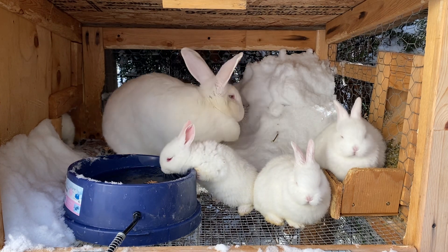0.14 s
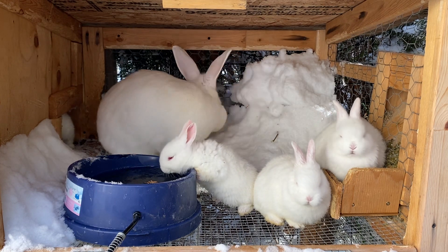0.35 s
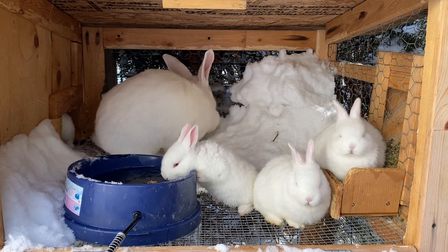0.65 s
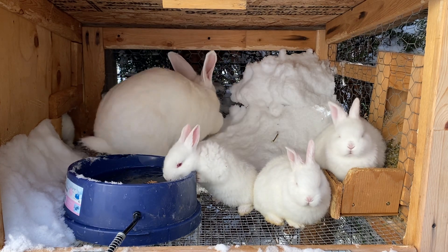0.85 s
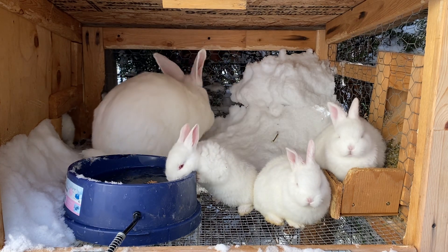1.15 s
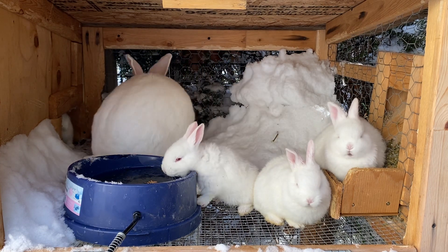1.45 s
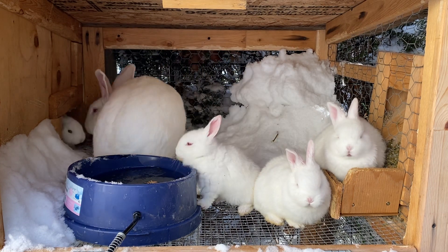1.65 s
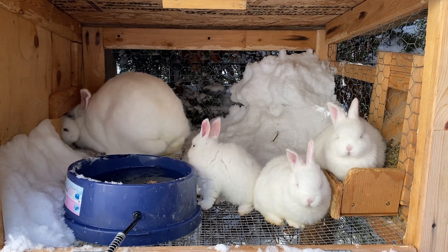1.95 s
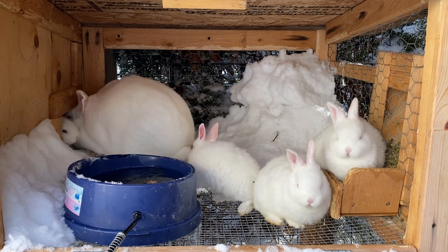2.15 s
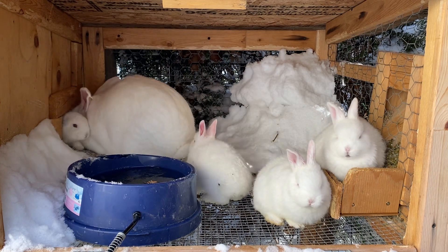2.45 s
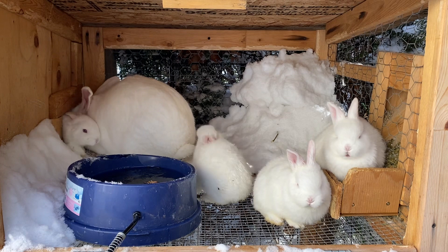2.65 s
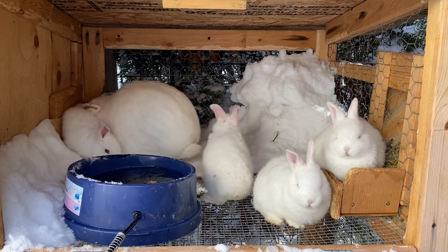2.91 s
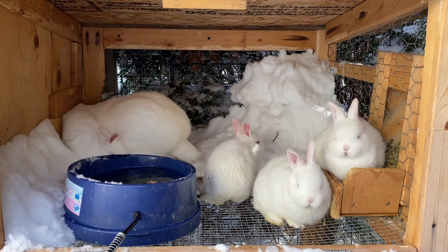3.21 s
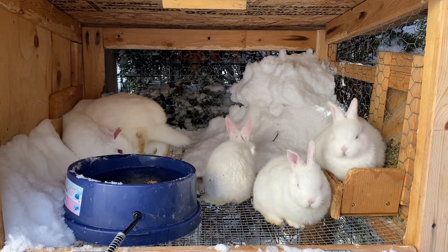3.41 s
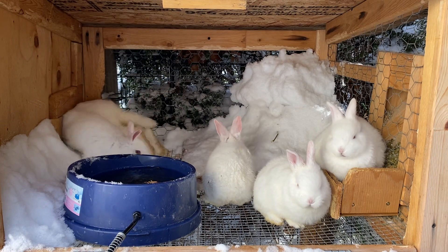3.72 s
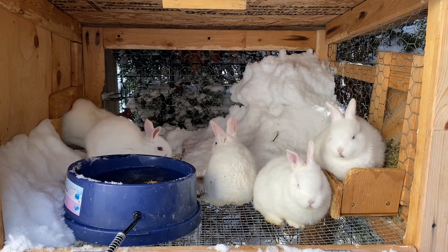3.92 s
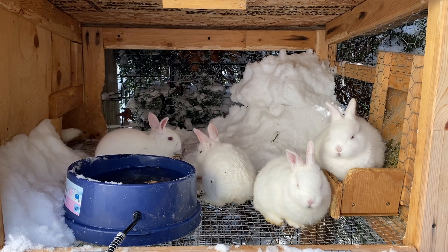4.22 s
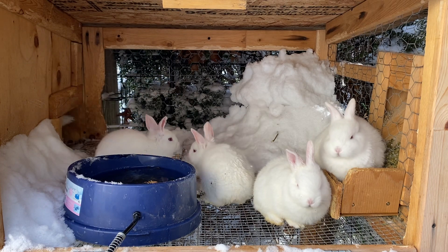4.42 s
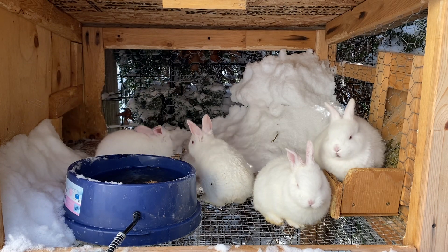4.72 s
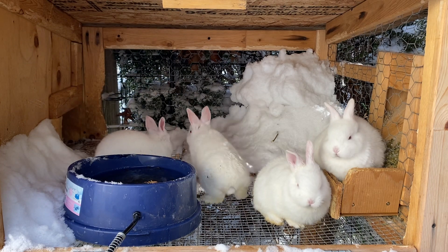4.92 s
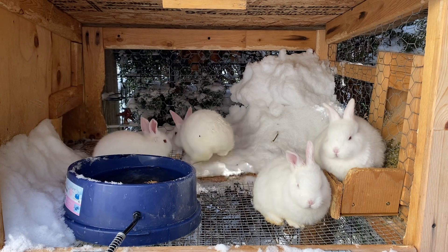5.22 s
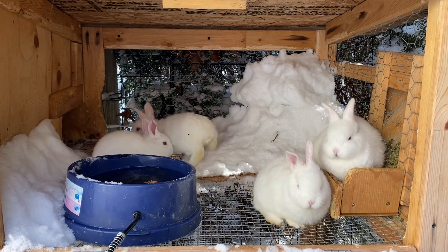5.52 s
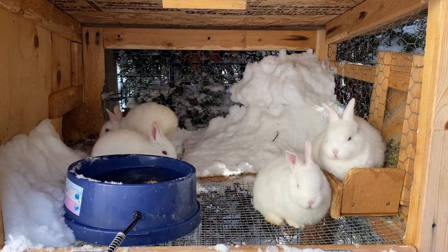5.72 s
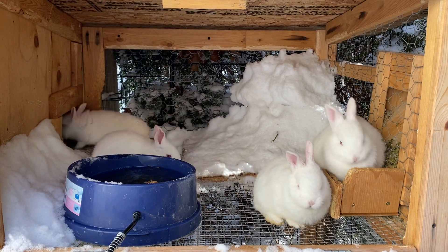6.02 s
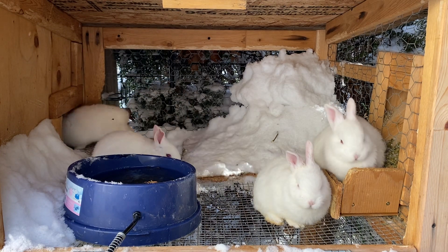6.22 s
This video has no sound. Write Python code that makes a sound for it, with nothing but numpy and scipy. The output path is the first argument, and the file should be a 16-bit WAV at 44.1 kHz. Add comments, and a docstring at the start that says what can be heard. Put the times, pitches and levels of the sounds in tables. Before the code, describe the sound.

Small claws scrabble and patter lightly over wire and planks, fur scuffs softly, paws thud low, and a hind foot knocks the wall once.

```python
"""Young rabbits in a hutch

Outdoors on a still day, young rabbits shuffle and hop in a wooden hutch with a wire floor. Claws tap wood and
scratch wire as decaying resonances; fur and paws scuff and rub as shaped noise; landing paws and shifting
weight ring the floor; one hind foot knocks a wall panel. A distant rumble and still air lie under all, as
coloured noise. A pocket recorder with two ports stands close by, at the open front."""
import sys
import numpy as np
from scipy import signal
from scipy.fft import rfft, irfft, next_fast_len
from scipy.io import wavfile
from scipy.ndimage import uniform_filter1d

SR = 44100
rng = np.random.default_rng(int(sys.argv[2]) if len(sys.argv) > 2 else 0)


def inscribe(sig):
    """Save sig as 16-bit PCM at rate SR to the path in sys.argv[1].

    A 1-D sig is mono; a 2-D sig holds one channel per row.
    Samples are clipped to [-1, 1] before scaling.
    """
    pcm = np.round(np.clip(np.atleast_2d(sig).T, -1, 1) * 32767)
    wavfile.write(sys.argv[1], SR, pcm.astype(np.int16))


N = 280322

# floor board resonances: (frequency [Hz], width [Hz], relative level [dB])
BOARD_MODES = [(136.4, 39.7, 2.5), (205.6, 76, -2), (300, 170, -8.5)]
# how restless the litter is, as level of the soft scuffing: (time [s], level [dB])
RESTLESSNESS = [(0.0, -83), (0.76, -79), (1.06, -83.5), (1.88, -80.5), (2.39, -82), (3.2, -72), (3.86, -72),
                (4.2, -78), (5.19, -78.5), (5.52, -79), (6.36, -78.5)]


def from_db(db):
    """Decibels to gain."""
    return 10 ** (np.asarray(db) / 20)


def rms_one(x):
    """Scale to rms 1."""
    return x / np.sqrt(np.mean(x ** 2) + 1e-20)


def peak_at(x, db):
    """Scale to a peak level."""
    return x / np.abs(x).max() * from_db(db)


def in_time(rows):
    """Read the columns of a time table at every sample."""
    s, *columns = np.transpose(rows)
    return [np.interp(np.arange(N) / SR, s, c) for c in columns]


def at_hz(points, hz):
    """Read a spectrum table on a log-frequency axis."""
    table_hz, values = np.array(points).T
    return np.interp(np.log(hz + 1), np.log(table_hz), values)


def colour(x, points):
    """Shape the spectrum by a table of levels."""
    size = next_fast_len(N)
    gain = from_db(at_hz(points, np.fft.rfftfreq(size, 1 / SR)))
    return irfft(rfft(x, size) * gain, size)[..., :N]


def band(x, low_hz, high_hz):
    """Band-pass."""
    return signal.sosfilt(signal.butter(2, [low_hz, high_hz], "band", fs=SR, output="sos"), x)


def resonate(x, hz, width_hz):
    """One damped resonance with a gain of about 1 at its top."""
    r = np.exp(-np.pi * width_hz / SR)
    feedback = [1, -2 * r * np.cos(2 * np.pi * hz / SR), r * r]
    return signal.lfilter([(1 - r * r) / 2, 0, (r * r - 1) / 2], feedback, x)


def pan(x, place):
    """Place a source from -1 (right) to 1 (left): that share of it is the left-right difference."""
    return x * np.array([[1 + place], [1 - place]])


def drift(rate):
    """Slow random wander with rms 1, made of noise low-passed around a rate in Hz."""
    r = np.exp(-2 * np.pi * rate / SR)
    wander = signal.lfilter([1], [1, -2 * r, r * r], rng.standard_normal(N + SR))
    return rms_one(wander[SR:])   # the first second lets the filter settle


def add(out, s, sound):
    """Mix a short sound in at a time."""
    i = round(s * SR)
    out[..., i:i + sound.shape[-1]] += sound[..., :N - i]


def scratches(rise_s=0.0013):
    """A jitter of tiny claw slips swells within milliseconds and dies; the wire favours one band and ticks on top."""
    # claws skidding on wire:
    # (time [s], skid peak [dB], loudest frequency [Hz], tick level [dB], decay by 60 dB [s])
    skid_rows = [(0.0652, -55.5, 3860, -72, 0.068), (0.578, -53, 3300, -78, 0.07),
                 (0.5957, -64, 4470, -61.5, 0.016), (0.609, -42, 1610, -69, 0.012),
                 (0.6305, -57, 2480, -73, 0.026), (0.7129, -42, 2500, -61.5, 0.03),
                 (0.8133, -33, 4040, -53.5, 0.03), (0.9734, -87.5, 1640, -78, 0.024),
                 (1.3135, -47.5, 2700, -65.5, 0.019), (1.3352, -65, 2650, -70, 0.12),
                 (1.3757, -50, 1760, -71, 0.045), (1.43, -52.5, 1700, -71, 0.046),
                 (1.4975, -54.5, 2170, -74, 0.028), (1.658, -44, 3300, -68, 0.042),
                 (1.7192, -54, 1560, -57.5, 0.015), (1.7569, -45, 2180, -100, 0.032),
                 (1.931, -57.5, 4070, -80, 0.054), (2.018, -40, 2620, -61, 0.041),
                 (2.152, -69, 1610, -88, 0.04), (2.9921, -51.5, 4800, -72, 0.13),
                 (3.032, -43.5, 2160, -59.5, 0.05), (3.1362, -48.5, 4030, -73, 0.04),
                 (3.249, -55.5, 2340, -79, 0.076), (3.3767, -60, 4660, -68.5, 0.037),
                 (3.4023, -50.5, 2340, -73, 0.074), (3.6503, -50.5, 3480, -72, 0.081),
                 (3.753, -47, 1560, -69, 0.072), (3.9002, -49, 2100, -72, 0.073),
                 (3.946, -44, 2030, -75, 0.035), (3.971, -37, 2110, -58.5, 0.034),
                 (4.2602, -56.5, 1870, -73, 0.056), (4.34, -55, 1500, -91, 0.023),
                 (4.4444, -46, 4660, -79, 0.028), (4.5927, -30, 3330, -58.5, 0.034),
                 (4.649, -38, 2820, -67, 0.031), (4.6646, -28, 4600, -50.5, 0.032),
                 (4.695, -46.5, 3490, -60, 0.015), (4.8868, -55, 1920, -73, 0.047),
                 (5.011, -49, 4300, -65, 0.045), (5.0685, -55, 1770, -75, 0.05),
                 (5.5483, -61, 1800, -72.5, 0.037), (5.91, -59, 6740, -62, 0.028)]
    out, t = np.zeros(N), np.arange(3500) / SR
    noises = rng.standard_normal((len(skid_rows), len(t)))
    for (s, db, hz, tick_db, t60), noise in zip(skid_rows, noises):
        swell = 1 - np.exp(-(t / rise_s) ** 2)
        jitter = noise * from_db(-60 * t / max(t60, .004)) * swell
        skid = resonate(jitter, hz, 0.15 * hz) + 0.86 * band(jitter, 540, 6430)
        tick = band(jitter, 5200, 22000)
        tick_rms = np.std(tick[:SR // 50])   # over the first 20 ms
        add(out, s, peak_at(skid, db) + from_db(tick_db) * tick / tick_rms)
    return out


def taps(place=-0.17):
    """One short rounded claw contact sets off a heavily damped ring; the wood keeps the treble down."""
    # single claw taps on wood: (time [s], peak [dB], pitch that scales both resonances [Hz])
    tap_rows = [(0.102, -46, 1010), (0.338, -41.5, 1100), (0.363, -56, 1240), (0.611, -39.5, 1600),
                (0.735, -40.5, 1320), (0.777, -44, 1070), (2.094, -59, 1410), (2.111, -35, 1200),
                (2.357, -54.5, 1250), (2.515, -38, 1310), (2.562, -58.5, 1130), (2.727, -49, 1060),
                (3.21, -48, 1190), (3.556, -44, 980), (3.579, -35, 1300), (4.047, -51, 1840),
                (4.087, -46.5, 1650), (4.492, -42.5, 1100), (4.912, -50, 991), (4.967, -55, 1310),
                (5.695, -48.5, 1210)]
    out, t = np.zeros((2, N)), np.arange(600) / SR
    noises = rng.standard_normal((len(tap_rows), len(t)))
    for (s, db, hz), noise in zip(tap_rows, noises):
        strike = (t == 0) + 0.13 * noise * np.exp(-t / 0.0032)
        ring = resonate(resonate(strike, 1.136 * hz, 0.69 * hz), 0.48 * hz, 0.48 * hz)
        dulled = signal.lfilter([.4], [1, -.6], ring)
        add(out, s, pan(peak_at(dulled, db), place))
    return out


def rubs(rough_db=5.0):
    """A swell of stick-slip friction noise passes through a resonance; the level is that of the swell's middle."""
    # rubs that favour one band: (middle [s], length [s], frequency [Hz], width [Hz], level [dB])
    rub_rows = [(1.346, 0.037, 2700, 400, -68), (1.35, 0.0092, 1720, 400, -63),
                (1.37, 0.007, 1730, 300, -56.5), (1.382, 0.008, 1750, 400, -61),
                (1.446, 0.015, 1610, 925, -58), (1.458, 0.039, 2200, 1230, -59.5),
                (3.439, 0.013, 1210, 950, -48), (3.443, 0.0067, 1330, 300, -38.5),
                (3.444, 0.033, 5000, 1550, -57), (3.745, 0.083, 500, 666, -66),
                (2.057, 0.01, 4050, 700, -66), (3.269, 0.018, 4900, 500, -67),
                (3.463, 0.0074, 1200, 1500, -67), (3.974, 0.016, 2140, 1500, -51.5),
                (4.001, 0.027, 533, 910, -48.5), (4.254, 0.018, 475, 850, -54.5),
                (4.338, 0.029, 500, 910, -51.5), (4.901, 0.035, 860, 1460, -60),
                (5.023, 0.013, 442, 676, -56.5), (5.827, 0.07, 1700, 1900, -71.5)]
    out, t = np.zeros(N), (np.arange(8000) - 4000) / SR
    rough = from_db(rough_db * np.tanh(drift(150)))
    noises = rng.standard_normal((len(rub_rows), len(t)))
    for (s, length, hz, width_hz, db), noise in zip(rub_rows, noises):
        swell = np.exp(-.5 * (2 * t / length) ** 2)
        start = round((s + t[0]) * SR)
        friction = noise * rough[start:start + len(t)]
        sing = swell * resonate(resonate(friction, hz, width_hz), hz, 0.5 * width_hz)
        add(out, s + t[0], from_db(db) * sing * np.linalg.norm(swell) / np.linalg.norm(sing))
    return out


def scuffing(lead_s=.06):
    """Gain of the scuffing: the restless undertone plus each shuffle's rise, hold and fall, added as power."""
    # single shuffles of fur and paws: (time [s], held for [s], level [dB])
    shuffle_rows = [(.07, .03, -79), (.34, 0.039, -77), (.485, 0.1, -72.5), (.585, 0.031, -64.5),
                    (.7, .04, -68), (.825, 0.028, -68), (1.315, 0.19, -69.5), (1.67, .14, -72.5),
                    (1.915, 0.022, -68.5), (2.03, 0.027, -67.5), (2.09, 0.049, -72), (2.5, 0.033, -75),
                    (2.8, .17, -75.5), (3.0, 0.054, -65), (3.1, 0.042, -60.5), (3.21, 0.055, -66.5),
                    (3.3, 0.056, -78), (3.401, 0.074, -62.5), (3.6, 0.13, -69), (3.78, 0.086, -75.5),
                    (3.91, 0.14, -64), (4.28, 0.049, -70), (4.44, 0.061, -70), (4.586, 0.023, -69.5),
                    (4.65, 0.032, -61), (4.885, 0.077, -73.5), (5.09, 0.054, -71.5), (5.2, 0.17, -73.5),
                    (5.82, 0.05, -93)]
    rise_db_per_s, fall_db_per_s = 505, 317
    power = from_db(in_time(RESTLESSNESS)[0]) ** 2
    t = np.arange(SR // 2) / SR - lead_s   # the rise comes ahead of the hold
    for s, hold, db in shuffle_rows:
        loss_db = np.maximum(-rise_db_per_s * t, fall_db_per_s * (t - hold))
        add(power, max(s - lead_s, 0), from_db(2 * (db - np.maximum(loss_db, 0))))
    return np.sqrt(power)


def scuff(per_s=900, spread_db=3.0, surge_db=0.5, patchy_db=4.0, place=0.7, apart=0.22):
    """Uneven grains of hair and straw over a soft brush noise; each size of grain surges partly on its own."""
    # colour of the scuffing: (frequency [Hz], relative level per Hz [dB])
    scuff_spectrum = [(300, 14.5), (800, 9), (2000, 3), (3400, -2.5), (4700, 0), (6000, -5.5), (7500, -7),
                      (11000, -9.5), (16000, -15)]
    out, edges = 0, np.geomspace(250, 17000, 10)
    # a busier litter rustles brighter: 0.19 dB per octave for each dB of restlessness above -77.5
    tilt_db = 0.19 * (in_time(RESTLESSNESS)[0] + 77.5)
    for low, high in zip(edges, edges[1:]):
        sizes = from_db(spread_db * np.minimum(rng.exponential(1, N), 4)) * rng.standard_normal(N)
        grains = sizes * (rng.random(N) < per_s / SR)
        brush, side = rng.standard_normal((2, N))
        both = pan(rms_one(grains + 0.34 * brush), place) + apart * side * [[1], [-1]]
        surge = from_db(patchy_db * drift(16.1) + tilt_db * np.log2(low / 1500))
        out = out + surge * band(both, low, high)
    litter = colour(out, scuff_spectrum)
    litter /= np.std(band(litter.mean(axis=0), 890, 13400))
    return scuffing() * from_db(surge_db * drift(18.0)) * litter


def thuds(contact_s=0.0034):
    """A soft padded push sets the floor under the paw ringing for a few cycles and briefly rattles the boards."""
    # paws landing: (time [s], ring peak [dB], ring frequency [Hz])
    landing_rows = [(0.6, -50, 106), (0.828, -45, 72), (0.852, -44, 95), (1.984, -42.5, 84),
                    (2.041, -44, 84), (3.024, -43, 125), (3.648, -51, 64), (3.684, -41, 71.4),
                    (3.729, -43, 73.4), (3.769, -42, 73), (3.998, -37.5, 121), (4.009, -38, 76),
                    (4.051, -45, 64.6), (4.11, -40.5, 141), (4.116, -41.5, 78), (4.143, -38, 81),
                    (4.232, -47, 110), (4.259, -38.5, 73.5), (4.269, -42, 166), (4.319, -45, 81),
                    (4.336, -42.5, 155), (4.368, -38, 71.3), (4.799, -38.5, 64.7), (5.018, -45, 213),
                    (5.035, -33, 74), (5.191, -38, 60.4), (5.249, -39.5, 71), (5.868, -45.5, 63.5)]
    ring_cycles = 11.5   # until the ring is 60 dB down
    rattle_db, rattle_t60_s = -9.5, 0.11   # rattle peak relative to the ring peak, decay by 60 dB
    out, t = np.zeros(N), np.arange(9000) / SR
    noises = rng.standard_normal((len(landing_rows), len(t)))
    for (s, db, hz), noise in zip(landing_rows, noises):
        push = 1 - np.exp(-t / contact_s)
        ring = from_db(-60 * t * hz / ring_cycles) * push * np.sin(2 * np.pi * hz * t)
        shake = noise * push * from_db(-60 * t / rattle_t60_s)
        rattle = sum(from_db(g) * resonate(resonate(shake, f, w), f, 2 * w) for f, w, g in BOARD_MODES)
        add(out, s, peak_at(ring, db) + peak_at(rattle, db + rattle_db))
    return out


def knock():
    """A hind foot hits the wall panel: its modes build up at their own pace, most low ones slower, and ring out."""
    # wall panel modes: (frequency [Hz], level relative to the knock [dB], decay by 60 dB [s], build-up [s])
    panel_modes = [(96, -20.5, 0.67, 0.0052), (149.5, 4.5, 0.2, 0.022), (254.7, 12.5, 0.12, 0.023),
                   (322, -11.5, 0.12, 0.0069), (430, -9, 0.077, 0.002), (670, -4.5, 0.022, 0.00081),
                   (754, -17, 0.027, 0.0013)]
    knock_s, knock_db = 4.587, -14.5
    out, t = np.zeros(N), np.arange(SR // 2) / SR
    rings = 0
    for hz, db, t60, rise in panel_modes:
        envelope = from_db(db - 60 * t / t60) * (1 - np.exp(-t / rise)) ** 2
        rings = rings + envelope * np.sin(2 * np.pi * hz * t)
    add(out, knock_s, from_db(knock_db) * rings)
    return out


def floor():
    """Shifting weight drives the floor frame and the boards like soft random pushes."""
    # weight shifting on the floor: (time [s], frame level [dB], board level [dB])
    weight_rows = [(0.0, -53.5, -64), (0.51, -53.5, -65), (0.8, -49, -61.5), (1.13, -54.5, -66.5),
                   (1.52, -59, -66), (2.83, -53.5, -65), (3.43, -54, -62.5), (3.98, -47.5, -58),
                   (4.11, -49.5, -55.5), (5.61, -57, -64.5), (5.98, -53.5, -61.5), (6.36, -58, -64.5)]
    # floor frame resonances: (frequency [Hz], width [Hz], relative level [dB])
    frame_modes = [(49, 18.8, 0.5), (68.2, 21.8, -3.5), (88, 33.8, -7.5)]
    out = 0
    for db, modes in zip(in_time(weight_rows), (frame_modes, BOARD_MODES)):
        push, ring = rng.standard_normal(N), 0
        for k, (hz, width_hz, gain_db) in enumerate(modes):
            mode = resonate(resonate(push, hz, width_hz), hz, 2.5 * width_hz)
            ring = ring + (-1) ** k * from_db(gain_db) * mode   # neighbours in opposite phase
        level = np.sqrt(uniform_filter1d(ring ** 2, size=2600) + 1e-12)   # pushes of even strength
        out = out + from_db(db) * ring / level
    return out


def hutch(x):
    """A few dull echoes off the plank walls, every second one swapped between the sides."""
    # wall echoes: (delay [s], level [dB])
    wall_echoes = [(.0036, -22.5), (.0061, -21.5), (.0094, -16.5), (.014, -30)]
    dull, out = signal.lfilter([.45], [1, -.55], x), x.copy()
    for k, (s, db) in enumerate(wall_echoes):
        add(out, s, from_db(db) * dull[::(-1) ** k])
    return out


def air(level_db=-59.5):
    """Distant rumble and still air: steady noise from all sides, with equally strong mid and side parts."""
    # colour of the background: (frequency [Hz], relative level per Hz [dB])
    air_spectrum = [(25, -9.5), (50, 2), (75, 0), (150, -18.5), (500, -18), (800, -19.5), (1250, -25.5),
                    (1900, -34.5), (2900, -58), (7000, -71), (11000, -49), (14000, -62), (17000, -77)]
    mid, side = rms_one(colour(rng.standard_normal((2, N)), air_spectrum))
    return from_db(level_db) * (mid + side * [[1], [-1]])


def scene():
    """Claws and rubs echo in the hutch; scuffing, floor, knock and air join them dry."""
    near = hutch(taps() + pan(scratches(), 0.67) + pan(rubs(), 0.7))
    return near + scuff() + pan(floor() + thuds(), 0.44) + pan(knock(), 0.49) + air()


def record(dry):
    """Two close ports: their difference varies with pitch and leads in phase; the top treble is one shared signal."""
    # left-right difference: (frequency [Hz], gain [dB])
    difference_gain = [(60, -13.5), (130, -7.5), (290, -1), (640, 3), (1400, 2.5), (3000, -2.5),
                       (6000, 2.5)]
    # phase lead of the difference: (frequency [Hz], lead [rad])
    difference_lead = [(130, 1.2), (300, 1.2), (800, 1.19), (2500, 1.46), (4500, 0.11)]
    # left port over right port: (frequency [Hz], level [dB])
    left_over_right = [(1400, -0.5), (2500, 3.5), (5800, -13), (6500, -31)]
    turn_from_hz, turn_hz, cutoff_hz = 6830, 4330, 16600
    size = next_fast_len(N)
    hz = np.fft.rfftfreq(size, 1 / SR)
    left, right = rfft(dry, size)
    mid, side = (left + right) / 2, (left - right) / 2
    side = side * from_db(at_hz(difference_gain, hz)) * np.exp(1j * at_hz(difference_lead, hz))
    lift = from_db(at_hz(left_over_right, hz) / 2)
    shared = np.clip((hz - 5900) / 500, 0, 1)   # from 6400 Hz up both ports carry the mid alone
    # the right leads by one more full turn for every turn_hz, half of it on each port
    turn = np.exp(1j * np.pi * np.maximum(hz - turn_from_hz, 0) / turn_hz)
    left_port = (1 - shared) * (mid + side) * lift + shared * mid / turn
    right_port = (1 - shared) * (mid - side) / lift + shared * mid * turn
    ports = irfft([left_port, right_port], size)[:, :N]
    return signal.sosfilt(signal.cheby2(12, 70, cutoff_hz, fs=SR, output="sos"), ports)


dry = scene()
out = record(dry)
inscribe(out)
```